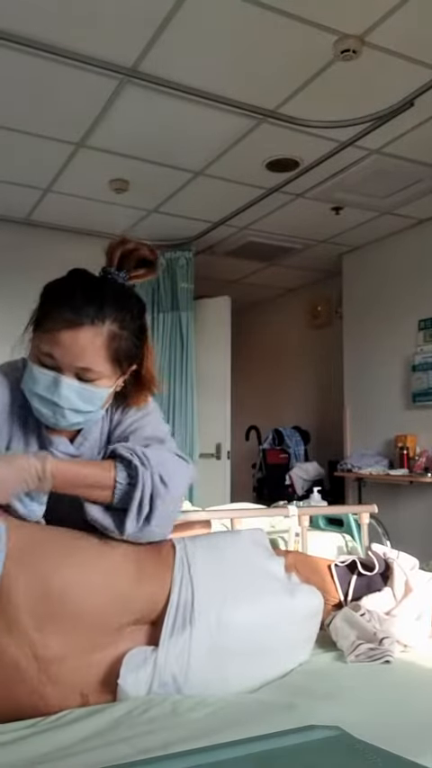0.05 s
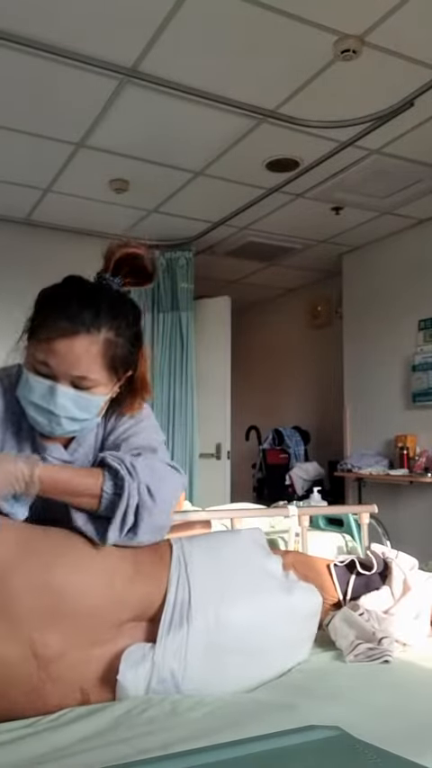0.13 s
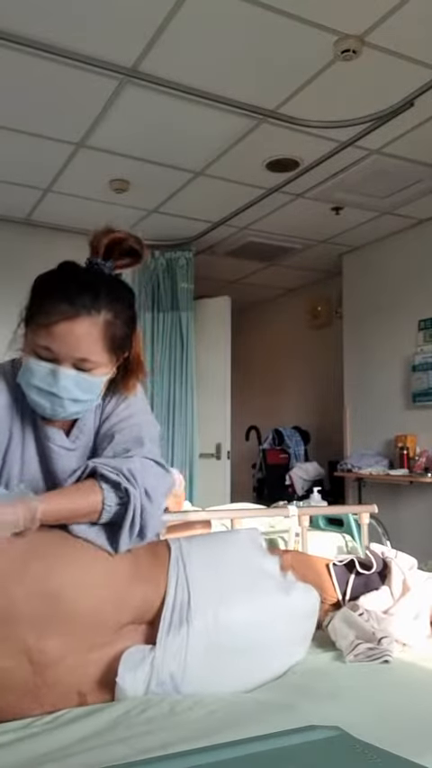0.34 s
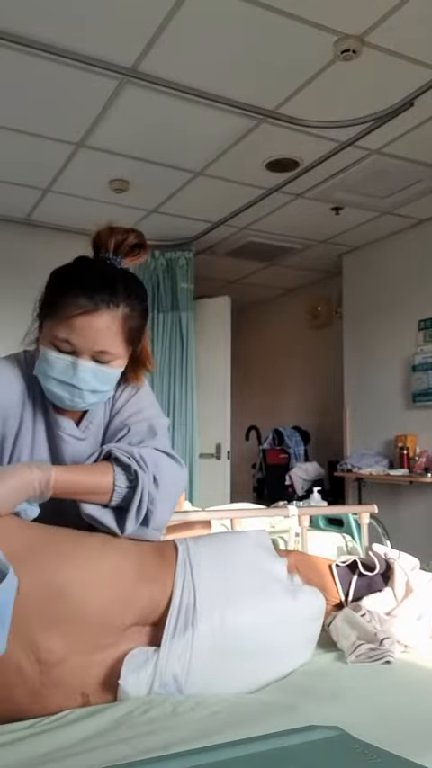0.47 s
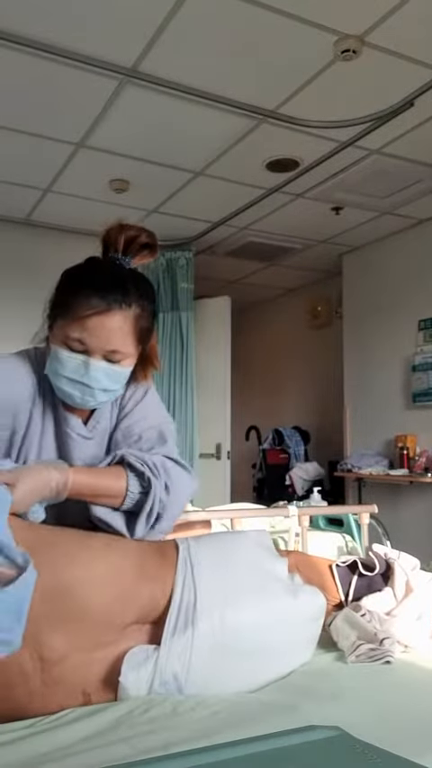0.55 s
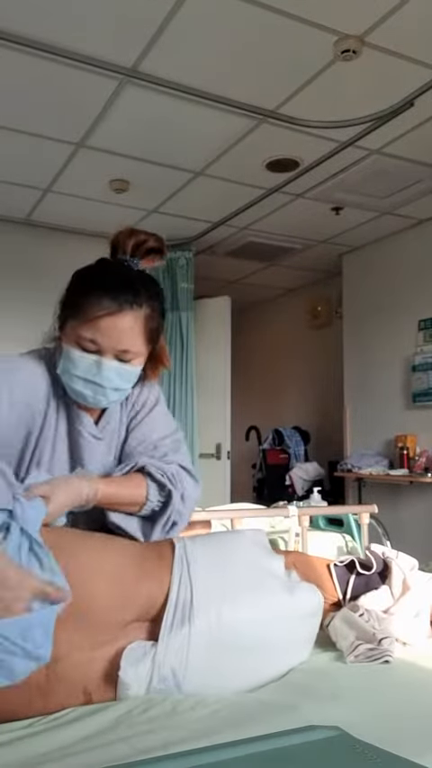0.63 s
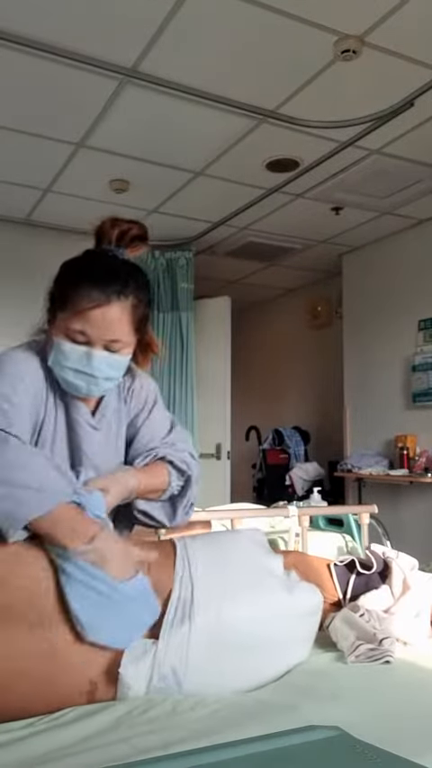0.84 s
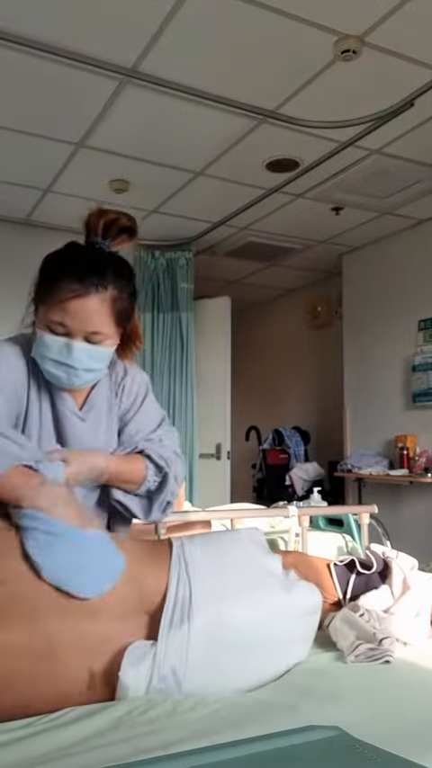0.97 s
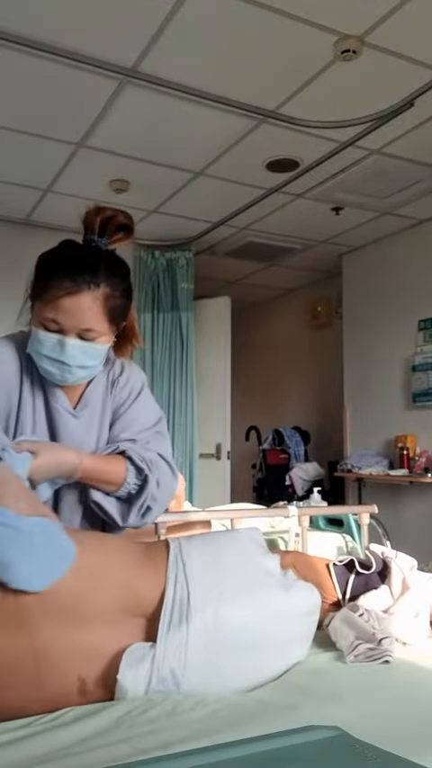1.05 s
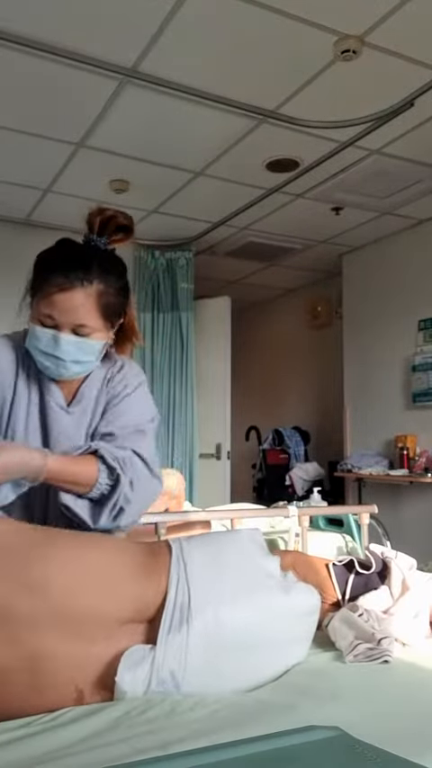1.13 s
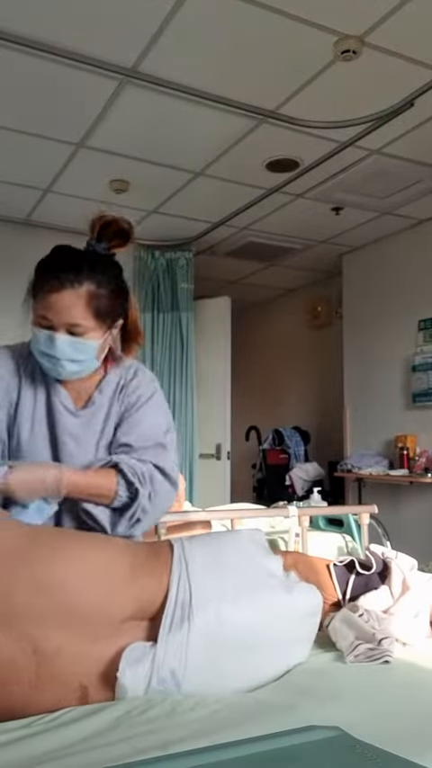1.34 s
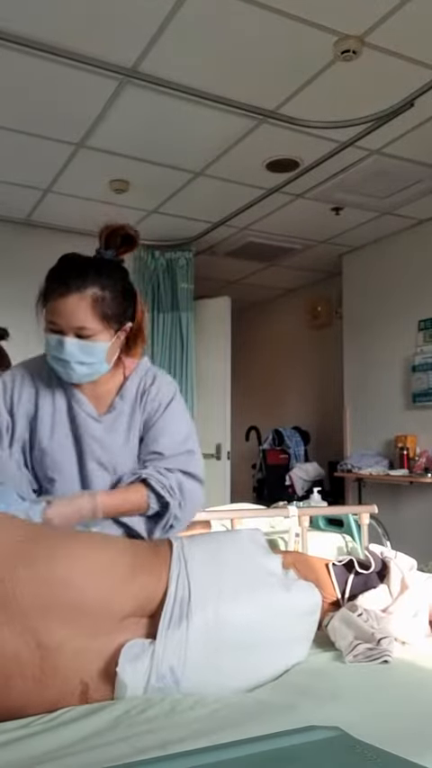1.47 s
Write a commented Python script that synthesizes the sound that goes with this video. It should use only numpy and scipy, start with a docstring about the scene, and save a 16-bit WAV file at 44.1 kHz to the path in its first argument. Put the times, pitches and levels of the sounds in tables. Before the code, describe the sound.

Two quick towel slaps land on a body, with dull thumps that ring briefly through the bed. Soft rubbing of cloth on skin follows, a little right of the microphone, in a small, quiet ward with low ventilation rumble.

```python
"""A small, quiet ward: off to the right, a towel is slapped twice against a person lying on a bed.
Each slap is a quick flurry of cloth flaps over dull thumps of body and mattress,
which set the bed ringing and hang on in the room.
Then the towel wipes over skin with a soft friction hiss. Ventilation rumbles underneath."""
import sys
import numpy as np
from scipy import signal
from scipy.fft import rfft, irfft
from scipy.io import wavfile

SR = 44100
rng = np.random.default_rng(int(sys.argv[2]) if len(sys.argv) > 2 else 0)


def wav_record(signal):
    """Record a signal, one row per channel, as 16-bit PCM in the file named by sys.argv[1]."""
    frames = np.transpose(np.atleast_2d(signal))
    bounded = np.clip(frames, -1, 1)
    # unit amplitude maps onto the largest positive 16-bit level
    quanta = np.round(bounded * 32767).astype(np.int16)
    wavfile.write(sys.argv[1], SR, quanta)


N = 66150
TIME = np.arange(N) / SR
FREQS = np.maximum(np.arange(N // 2 + 1) * SR / N, 1)


def towel_slaps():
    """Each fold lands as a grainy burst, coloured by the air it traps; faster folds are brighter."""
    # Folds landing: start_s, level_db, attack_s, t60_s, tilt_db_per_octave, hollow_hz, hollow_db
    flaps = [(0.2264, -28, 0.005, 0.23, 1, 4130, 8.5), (.2335, -22.5, 0.0023, 0.1557, 2.96, 4500, 2.5),
             (0.249, -24.5, 0.002, 0.19, 0.15, 900, 4), (0.299, -26, .004, 0.2061, -2, 970, -0.5),
             (0.318, -31, 0.0065, 0.11, -2, 623, 9), (0.397, -27.5, 0.01, 0.1543, -1.5, 4040, 9),
             (0.418, -26, 0.0063, 0.13, -1.06, 1700, 4.5)]
    # Tone of slapped cloth: frequency_hz, level_db
    cloth = [(60, -2.5), (150, -1.5), (300, -10.5), (450, -1.5), (900, 0.5), (1500, -4.5), (2500, -4),
             (4500, -7), (6800, -8.5), (8200, -21.5), (10300, -24), (12000, -17.5), (14500, -25)]
    hollow_half_width_oct, room_send_db = 0.32, -1.5
    slaps = 0
    for start, db, attack, t60, tilt_db, hollow_hz, hollow_db in flaps:
        trapped_air_db = hollow_db / (1 + (np.log2(FREQS / hollow_hz) / hollow_half_width_oct) ** 2)
        colour_db = at_hz(cloth, FREQS) + tilt_db * np.log2(FREQS) + trapped_air_db
        slaps = slaps + from_db(db) * burst(start, attack, t60) * noise(colour_db)
    slaps = slaps * fibre_grain(depth_db=2.4, hz=700)
    return slaps + from_db(room_send_db) * room(slaps)


def mattress_thumps():
    """Soft pushes set the bed ringing and squash the padding, whose dull thud spreads in the room."""
    # Weight meeting the mattress: start_s, relative_level_db, contact_s
    hits = [(0.233, -25, 0.0076), (0.2426, -20, 0.0046), (.250, -25, 0.0047), (0.27, -19.5, 0.00386),
            (0.292, -21, 0.00416), (.326, -24.5, 0.00331), (0.424, -22.5, 0.00422), (0.4335, -19.5, 0.0039),
            (.463, -24, 0.0032), (.479, -29, 0.0027)]
    # Resonances of bed and room: pitch_hz, gain_db, t60_s
    bed_modes = [(65.6, -1, 0.31), (102.4, -6, 0.072), (130.9, -5, .3), (196.6, -18, 0.2),
                 (235.4, -14.5, 0.19), (304.3, -5, .35), (420.8, 5.5, 0.29), (490, -2.5, .4)]
    # Tone of squashed padding: frequency_hz, level_db
    padding = [(30, -34), (55, -35), (85, -6.5), (130, 4.5), (200, 2.5), (280, 0.5), (370, -12),
               (700, -7.5), (1200, -23.5), (3000, -52)]
    push_db, ring_db, thud_db, room_send_db = 1, -3, -8, -2.5
    low_cut_hz = 117
    force = sum(from_db(db) * np.sin(np.pi * np.clip((TIME - start) / contact, 0, 1)) ** 2
                for start, db, contact in hits)
    push = signal.sosfilt(signal.butter(2, low_cut_hz, "high", fs=SR, output="sos"), force)
    pulse_area = SR * np.mean([contact for _, _, contact in hits]) / 2
    rings = sum(from_db(db) * ring(push / pulse_area, hz, t60) for hz, db, t60 in bed_modes)
    squash_power = sum((from_db(db) * burst(start, contact, t60=0.12)) ** 2
                       for start, db, contact in hits)
    thud = from_db(thud_db) * np.sqrt(squash_power) * noise(at_hz(padding, FREQS))
    return from_db(push_db) * push + from_db(ring_db) * rings + thud + from_db(room_send_db) * room(thud)


def towel_wipe():
    """Friction hiss follows the hand's effort; bands of noise add a low tone dying away at the start, a low
    murmur and a hollow ring."""
    # Effort of the wiping hand: time_s, level_db
    effort = [(0, -46.5), (.05, -47), (.075, -42.5), (.125, -50.5), (.18, -64), (.55, -53.5), (.63, -51),
              (.76, -45), (.83, -46), (.95, -43), (1.06, -47), (1.2, -48), (1.36, -49.5), (1.5, -52.5)]
    # Tone of towel on skin: frequency_hz, level_db
    rub = [(150, -3.5), (400, 3.5), (700, 3), (1050, -3.5), (2200, -1.5), (3700, -4.5), (4900, 0.5),
           (5900, -3.5), (6700, -0.5), (8200, -17), (10300, -14.5), (12000, -10), (14500, -14)]
    # Bands of noise: start_s, end_s, centre_hz, half_width_hz, level_db; the first is a low tone dying away
    # before the wipe, the rest come with the rubbing
    noise_bands = [(-.1, 0.21, 270, 25, -52.5), (0.657, 1.6, 135, 51, -48.5), (0.45, 1.49, 300, 660, -59.5),
                   (0.677, 1.528, 793, 46, -54), (0.59, 1.04, 3050, 72, -54), (.98, 1.48, 3010, 53, -61.5),
                   (0.6, 1.09, 4520, 300, -55), (0.84, 1.03, 6650, 200, -50.5)]
    room_send_db, fade_s = -4.5, 0.076
    swell = from_db(np.interp(TIME, *np.transpose(effort)))
    hiss = swell * noise(at_hz(rub, FREQS)) * fibre_grain(depth_db=1.15, hz=148)
    wipe = hiss + from_db(room_send_db) * room(hiss)
    for start, end, hz, half_width, db in noise_bands:
        stroke = np.clip(np.minimum(TIME - start, end - TIME) / fade_s, 0, 1)
        band_db = -20 * np.log10(1 + ((FREQS - hz) / half_width) ** 2)
        wipe = wipe + from_db(db) * stroke * noise(band_db)
    return wipe


def room(x):
    """The ward's diffuse reflections bloom quickly and die sooner in the treble."""
    # Reverb tail: frequency_hz, t60_s
    decay_times = [(100, 0.41), (500, 0.48), (2000, 0.31), (6000, 0.29), (13000, 0.29)]
    bloom_s = 0.007
    white_spectrum = rfft(noise(0 * FREQS))
    edges_hz = np.append(0, np.geomspace(125, SR / 2, 8))
    response = 0
    for low, high in zip(edges_hz, edges_hz[1:]):
        band = irfft(white_spectrum * (FREQS >= low) * (FREQS < high), N)
        decay = from_db(-60 * TIME / at_hz(decay_times, (low + high) / 2))
        envelope = decay * (1 - np.exp(-TIME / bloom_s))
        response = response + band * envelope / np.sqrt(np.sum(envelope ** 2))
    return signal.fftconvolve(np.atleast_2d(x), response, axes=1)[:, :N]


def ventilation():
    """Room tone from the vents: steady rumble, faint hiss and a low hum."""
    # Tone of the ventilation noise: frequency_hz, level_db
    rumble = [(20, -3), (32, 2), (42, -1), (60, 4.5), (85, -2.5), (140, -3), (190, 1.5), (245, -5),
              (320, -18.5), (600, -15), (1500, -22), (6000, -36.5), (8500, -55), (14500, -37)]
    # Steady hum tones: pitch_hz, level_db
    tones = [(59.5, -54.5), (138, -59), (243, -57)]
    rumble_db = -48.5
    hum = sum(from_db(db) * np.sqrt(2) * np.sin(2 * np.pi * (hz * TIME + rng.random()))
              for hz, db in tones)
    return from_db(rumble_db) * noise(at_hz(rumble, FREQS)) + hum


def fibre_grain(depth_db, hz):
    """Uneven gain of fibres catching and letting go, soft-limited against lone spikes."""
    wobble = irfft(rfft(rng.standard_normal(N)) / (1 + (FREQS / hz) ** 2), N)
    return rms_one(from_db(depth_db * 2 * np.tanh(rms_one(wobble) / 2)))


def noise(colour_db):
    """Coloured stereo noise at unit rms, centred in the bass and wide in the treble."""
    # Likeness of left and right: frequency_hz, correlation
    likeness = [(130, 1), (290, 0.97), (620, 0.74), (1360, -0.5), (2800, -0.009), (6500, -0.048)]
    mid, side = rfft(rng.standard_normal((2, N)))
    alike = np.clip(at_hz(likeness, FREQS), -1, 1)
    stereo = np.sqrt(1 + alike) * mid + np.sqrt(1 - alike) * np.array([side, -side])
    return rms_one(irfft(from_db(colour_db) * stereo, N))


def ring(x, hz, t60):
    """One resonance: a unit click sets off a dying sine of height 1."""
    radius = np.exp(-np.log(1000) / (t60 * SR))
    angle = 2 * np.pi * hz / SR
    return signal.lfilter([0, np.sin(angle)], [1, -2 * radius * np.cos(angle), radius ** 2], x + 1e-18)


def burst(start, attack, t60):
    """Hit envelope: a linear rise and an exponential fall."""
    age = np.maximum(TIME - start, 0)
    return np.minimum(age / attack, 1) * np.exp(-np.log(1000) * np.maximum(age - attack, 0) / t60)


def at_hz(points, hz):
    """Read a curve on a log-frequency axis."""
    points = np.array(points)
    return np.interp(np.log(hz), np.log(points[:, 0]), points[:, 1])


def from_db(db):
    """Decibels to gain."""
    return 10 ** (np.asarray(db) / 20)


def rms_one(x):
    """Scale to unit rms."""
    return x / np.sqrt(np.mean(x ** 2) + 1e-20)


def scene():
    """Slaps and thumps up front, wiping and ventilation beneath."""
    return towel_slaps() + mattress_thumps() + towel_wipe() + ventilation()


def record(dry):
    """The mids and most of the treble lean right; the very top is cut steeply."""
    # Stereo balance at the microphone: frequency_hz, left_minus_right_db
    balance = [(60, -2), (200, 0), (370, -2), (680, -9.5), (1250, -4.5), (2300, -6), (7000, -8.5),
               (8500, 5), (10000, 3), (12500, -9)]
    high_cut_hz = 14400
    hz = np.maximum(np.arange(N + 1) * SR / (2 * N), 1)
    pan = from_db(at_hz(balance, hz) * np.array([[.5], [-.5]]))
    pan = pan / np.sqrt(np.mean(pan ** 2, axis=0))  # constant power
    panned = irfft(rfft(dry, 2 * N) * pan)[:, :N]
    return signal.sosfilt(signal.ellip(12, .1, 80, high_cut_hz, fs=SR, output="sos"), panned)


dry = scene()
out = record(dry)
wav_record(out)
```